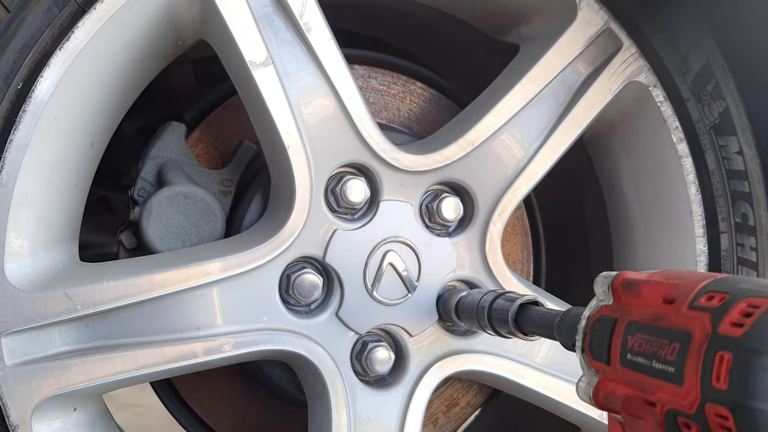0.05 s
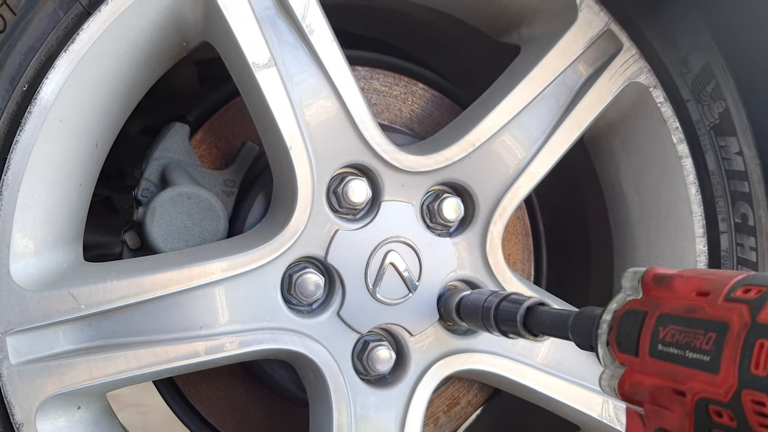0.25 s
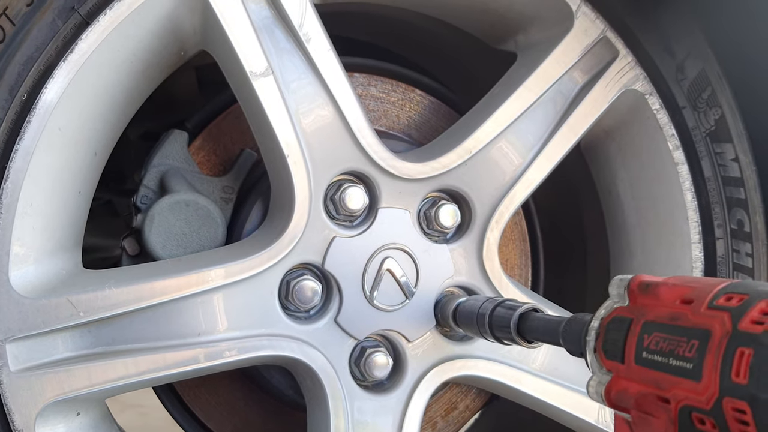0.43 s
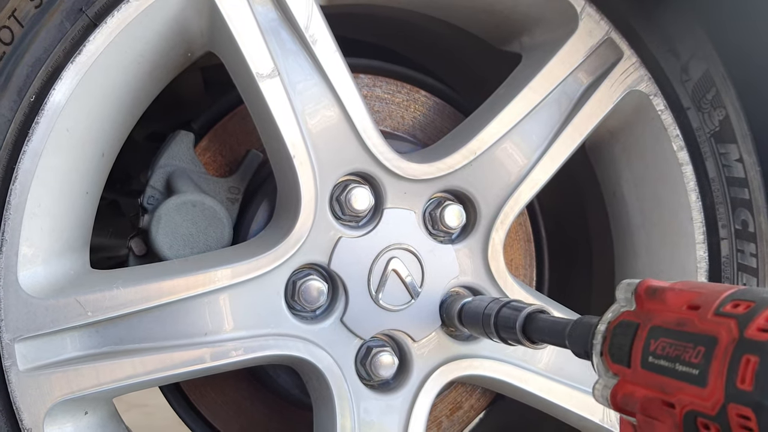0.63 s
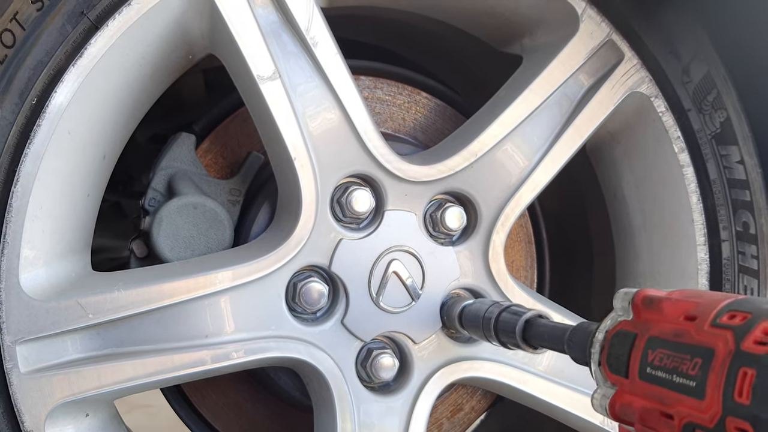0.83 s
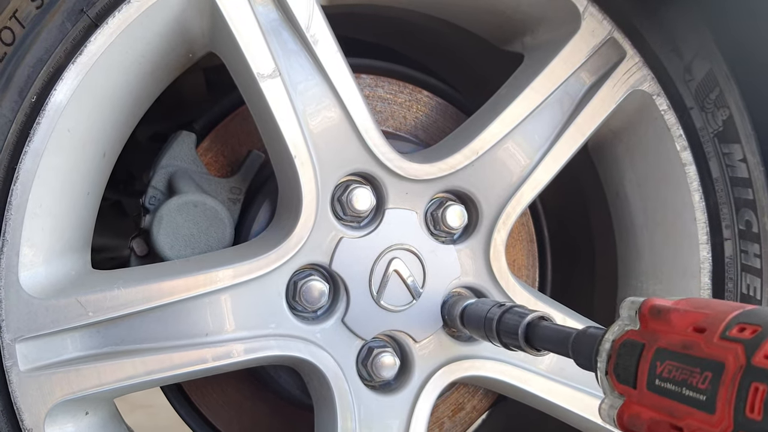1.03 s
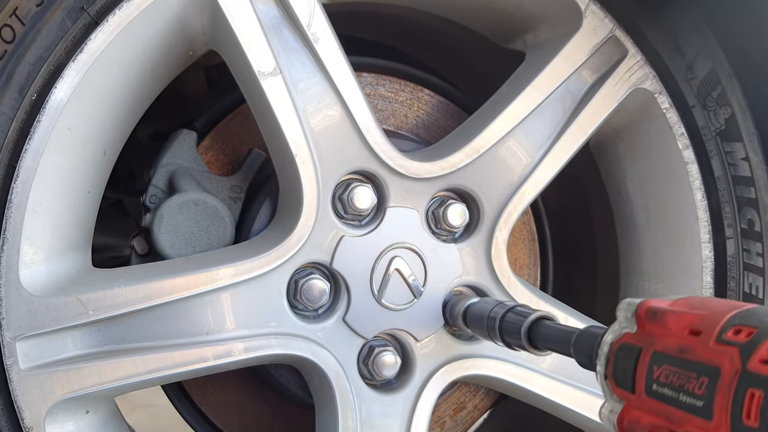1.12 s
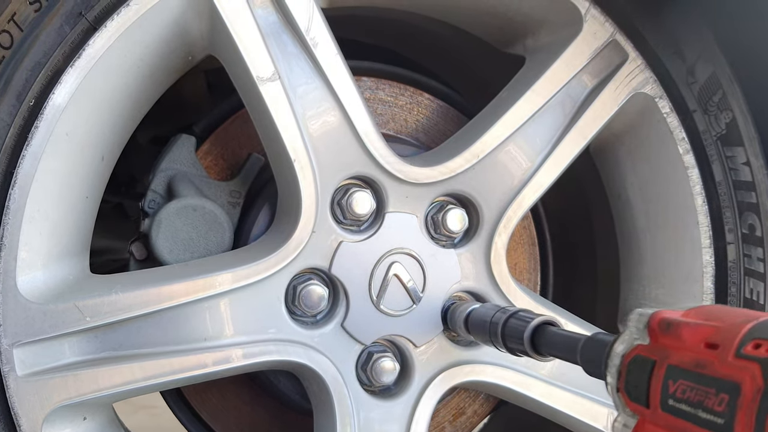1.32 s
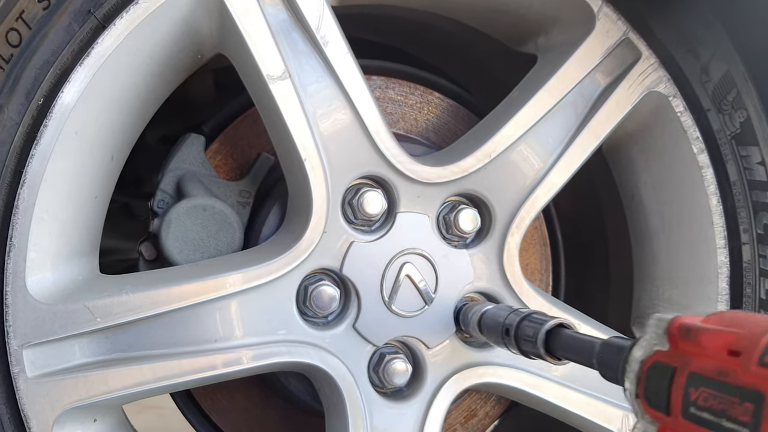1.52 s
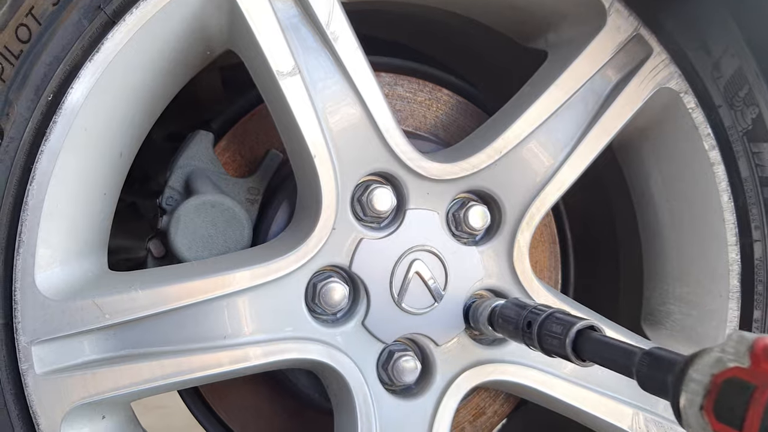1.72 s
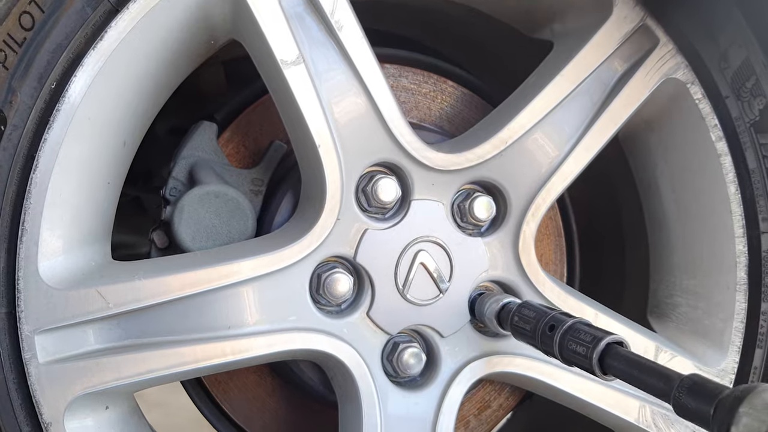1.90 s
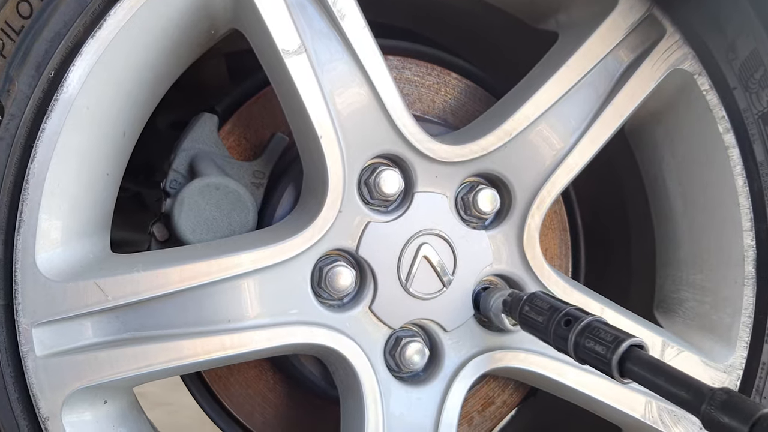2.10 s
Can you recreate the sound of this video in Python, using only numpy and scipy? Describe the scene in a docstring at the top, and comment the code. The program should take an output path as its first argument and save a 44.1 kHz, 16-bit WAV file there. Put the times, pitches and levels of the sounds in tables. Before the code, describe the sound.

Close to the microphones, an impact wrench loosens a car wheel nut: slack knocks, about a second of harsh, dense hammering with wheel ring, lighter gritty spinning with clinks, sudden stop, short reverberant tail, tiny metal touches.

```python
"""In a workshop, close by, a cordless impact wrench loosens a lug nut on an alloy wheel.
Knocks take up the socket's slack; hammer blows, about 47 a second, are noise bursts exciting wheel modes.
The nut then spins: gritty noise and sines that follow motor speed make the whirr, with a brief singing tone
and loose clinks, until the motor brakes with a clunk. Decaying noise by convolution gives the reverberation;
light ticks follow as the socket is drawn off, over faint air and an uneven low rumble."""
import sys
import numpy as np
from scipy import signal
from scipy.fft import rfft, irfft, next_fast_len
from scipy.io import wavfile

SR = 44100
rng = np.random.default_rng(int(sys.argv[2]) if len(sys.argv) > 2 else 0)


def generate_wav(sig):
    """Save sig (samples, or channels by samples) to the path in sys.argv[1] as 16-bit PCM at SR."""
    pcm = np.round(np.clip(np.atleast_2d(sig).T, -1, 1) * 32767).astype(np.int16)
    wavfile.write(sys.argv[1], SR, pcm)


N = 94815
T = np.arange(N) / SR
SIZE = next_fast_len(2 * N)
FREQ = np.maximum(np.arange(SIZE // 2 + 1) * SR / SIZE, 1)

# All levels in the tables are relative: the layer gains are added to them.
# single knocks of hammer and socket: t/s, level/dB, chatter hold/s,
# wheel ring re level/dB, thump re level/dB
KNOCKS = [(0.1472, -15, .002, 8.5, -14.5), (0.1526, -19.5, .002, 13, -17), (0.2108, -11.5, .007, 14, -10.5),
          (0.221, -25.5, .004, 4.5, -3.5), (0.2353, -1.5, .005, 4, 2), (0.2602, -2.5, .004, 0, -4.5),
          (0.2694, -2, .006, -1, -10.5), (0.307, -6, .005, 7, -7), (0.327, -8.5, .003, 0.5, -13),
          (1.133, -22, .001, -1.5, -4), (1.266, -23.5, .005, 0, -1), (1.336, -15, .006, 9.5, -4),
          (1.389, -30.5, .003, 22, 1)]
# hammer blows: t/s, level/dB, recoil thump level/dB
BLOWS = [(0.2936, -4, -23.5), (0.3188, -3.5, -31), (0.3364, -6, -29), (0.3596, -3.5, -26.5),
         (0.3778, -3.5, -24), (0.401, -4.5, -18), (0.4215, -5.5, -25.5), (0.4453, -7.5, -31.5),
         (0.4656, -4, -24.5), (0.4875, -1.5, -24.5), (0.5073, -4, -23), (0.5289, -6.5, -29),
         (0.5495, -4, -33.5), (0.5724, -6.5, -29.5), (0.5917, -3.5, -24.5), (0.6144, -5, -29),
         (0.636, -5, -25), (0.6588, -3.5, -28.5), (0.6777, -3.5, -22.5), (0.7001, -5, -27),
         (0.7204, -5, -29.5), (0.742, -5.5, -38), (0.7652, -8, -25.5), (0.7842, -6, -24), (0.8068, -6, -30),
         (0.828, -3.5, -17), (0.849, -4.5, -26.5), (0.8714, -4.5, -27.5), (0.8931, -4, -24),
         (0.9151, -3.5, -30.5), (0.9355, -4, -21), (0.9582, -5, -31), (0.9803, -6, -37),
         (1.0031, -7.5, -34.5), (1.0236, -3, -26), (1.0466, -3, -26.5), (1.068, -5, -27.5),
         (1.0925, -5, -27.5)]
# colour of the steel contact: f/Hz, level/dB
STEEL_COLOUR = [(60, -14.5), (200, -4), (350, 4), (600, 6), (900, 2.5), (1500, 1), (2200, 2.5), (3200, 4.5),
                (4500, 3.5), (6500, 0), (9000, -1.5), (11000, -0.5), (13000, 5.5), (14500, 1.5),
                (16000, -3)]
# modes of wheel, brake disc, socket and anvil: f/Hz, level/dB, t60/s
WHEEL_MODES = [(315.7, 5.5, .13), (356.3, 4, 0.64), (466.6, 9, .1), (681.5, 4, 0.08), (762, 2, 1.1),
               (1045.6, 9.5, .15), (1072.6, 13, 0.37), (1130, 7.5, .15), (1548, 1.5, 0.23), (1966, 4, 0.13),
               (2606, -0.5, .06), (3260, 1, 0.077), (4130, -1.5, 0.18), (5640, -2, 0.025),
               (12500, -4.5, .015), (13420, -4.5, 0.021)]
# colour of the recoil thump: f/Hz, level/dB
THUMP_COLOUR = [(20, -5.5), (45, 13.5), (65, 16.5), (90, 18.5), (130, 13.5), (200, 4), (320, 4),
                (550, -5.5), (900, -14), (3000, -52)]
# motor effort: t/s, level/dB
MOTOR_LEVEL = [(.145, -48), (.16, -20), (.205, -16), (.25, 6.5), (.7, 7), (1.09, 6.5), (1.13, -3.5),
               (1.22, -2.5), (1.31, -3.5), (1.39, -3.5), (1.415, -6.5), (1.435, -26), (1.5, -70)]
# motor speed: t/s, share of free speed/1
MOTOR_SPEED = [(.145, 0.39), (.22, 0.83), (1.09, .87), (1.15, 1.04), (1.25, 0.96), (1.33, 0.92),
               (1.39, 0.75), (1.44, 0.37)]
# whine partials at free speed: f/Hz, level/dB
WHINE_PARTIALS = [(161, -47), (325, -56.5), (673, -53.5), (1007, -55), (1555, -60), (1943, -59),
                  (4549, -52.5), (4920, -60), (6062, -60.5), (7424, -58)]
# colour of the gear noise: f/Hz, level/dB
GEAR_COLOUR = [(50, -10), (170, -8.5), (350, 6), (650, 5.5), (1000, 9), (1600, 6), (2250, 1), (2700, 6.5),
               (3700, 3.5), (5000, 3), (8000, -0.5), (12000, -1.5), (16000, -6.5)]
# gliding tone of the spinning socket: t/s, f/Hz, level/dB
SING_TRACK = [(1.2, 3270, -75), (1.25, 3300, -34), (1.29, 3300, -63), (1.325, 3350, -32.5),
              (1.34, 3280, -53), (1.37, 3250, -100)]
# colour of the loose clinks: f/Hz, level/dB
RATTLE_COLOUR = [(100, 6), (3000, -3), (6000, 2), (15000, -20)]
# touches as the socket seats and comes off: t/s, tap level/dB, ring f/Hz, ring level/dB
TICK_EVENTS = [(.12, -32.5, 1904, -42), (1.628, -51.5, 1100, -75), (1.777, -58, 3290, -64),
               (1.786, -59.5, 1080, -53.5), (1.944, -54.5, 2527, -60), (2.057, -56, 2606, -70),
               (2.086, -60, 6930, -81.5), (2.111, -58, 2054, -68)]
# colour of the taps: f/Hz, level/dB
TICK_COLOUR = [(100, 1.5), (1000, 6.5), (5000, -2.5), (7500, -13.5), (11000, -18.5), (16000, -25.5)]
# reverberation by band: f/Hz, t60/s, level/dB
ROOM_DECAY = [(100, 0.94, -16.5), (220, 0.47, -22), (384, 0.78, -10), (750, .8, -16.5), (1100, 0.54, -13.5),
              (2180, 0.68, -11), (3330, 0.58, -12), (5000, 0.61, -13), (9000, 0.26, -18.5),
              (15000, .33, -21.5)]
# colour of the reverberant wash already fading at the start: f/Hz, level/dB
WASH_COLOUR = [(100, 6), (400, 13), (1000, 7.5), (2500, 9), (5000, 5.5), (9000, -7), (15000, -20.5)]
# colour of the faint air: f/Hz, level/dB
AIR_COLOUR = [(60, -7.5), (200, -4.5), (400, 4), (700, -19), (1100, -13), (2500, -19), (5000, -27.5),
              (7000, -33), (10000, -33.5), (15000, -59)]
# colour of the low rumble: f/Hz, level/dB
RUMBLE_COLOUR = [(20, -30.5), (45, -12), (70, -7.5), (88, 4.5), (110, -3.5), (160, -11.5), (260, -21.5),
                 (600, -35.5), (2000, -74.5)]
# course of the rumble: t/s, level/dB
RUMBLE_LEVEL = [(0, -49), (.05, -41), (.12, -49), (.19, -43.5), (1.15, -49), (1.36, -53.5), (1.41, -39),
                (1.48, -53), (1.55, -41), (1.63, -60), (1.70, -46), (1.78, -58), (1.87, -50.5), (1.95, -59),
                (2.02, -66), (2.09, -54.5), (2.15, -50.5)]
# stereo width: f/Hz, side re mid level/dB
SIDE_TO_MID = [(40, 7.5), (85, 5), (175, 2), (350, -1.5), (700, -4.5), (1200, -5), (1800, -1.5), (2800, 2),
               (5000, -.3), (12000, 0)]

# envelopes: attack time, release time constants; blows also start late by BITE_S
ATTACK_S, RELEASE_S, BITE_S, CHATTER_S = .0009, .0045, .0006, .0048
CRACK_DB, CRACK_S, GRAIN_DB = 1.5, 0.00081, 2.5
BLOW_DB, RECOIL_DB = 5, 25  # added to the levels in BLOWS
STEEL_DB, WHEEL_DB, THUMP_DB, THUMP_S = -15, -12.5, -7.5, 0.0089
THUMP_SHAKE_DB, KICK_DB, KICK_S = -2, -5, 0.00061
CAM_DB, CAM_S = -13, .003
CLANG_DB, CLANG_S, CLANG_LOW_HZ, CLANG_HIGH_HZ = -25, .007, 1300, 15500
WHINE_DB, WHINE_WAVER = 1, .006  # waver as a share of speed
GEAR_DB, GEAR_GRAIN_DB, GEAR_RING_DB, GEAR_UNEVEN_DB = -30, 1, -28.5, 1.5
TURN_HZ, TURN_DB = 34.23, 2  # wobble once a turn, rate at free speed
RATTLE_FROM_S, RATTLE_TO_S, RATTLE_DB, RATTLE_SCATTER_DB = 1.14, 1.38, -45, 2.5
BRAKE_S, BRAKE_HZ, BRAKE_DB, BRAKE_RISE_S = 1.394, 570, -23, 0.0029
TICK_S, TICK_RING_S = 0.0042, 0.014
ROOM_RISE_S = 0.0063
WASH_DB, WASH_FALL_DB_S, AIR_DB = -48, 75.5, -67
TOP_HZ = 15900


def undb(db):
    """Amplitude ratio: decibels to gain."""
    return 10 ** (np.asarray(db) / 20)


def curve(rows, at=T, axis=1):
    """Linear interpolation of one table column."""
    rows = np.array(rows)
    return np.interp(at, rows[:, 0], rows[:, axis])


def per_hz(rows, axis=1):
    """Interpolation of one table column over log frequency."""
    rows = np.array(rows)
    return np.interp(np.log(FREQ), np.log(rows[:, 0]), rows[:, axis])


def through(x, response):
    """Linear filtering: multiplication of spectra."""
    return irfft(rfft(x, SIZE) * response, SIZE)[..., :N]


def colour(x, rows):
    """Minimum-phase filtering: a folded cepstrum gives a causal response."""
    cepstrum = irfft(np.log(undb(per_hz(rows))), SIZE)
    cepstrum[1:SIZE // 2] *= 2
    cepstrum[SIZE // 2 + 1:] = 0
    return through(x, np.exp(rfft(cepstrum)))


def unit(x):
    """Normalization to rms 1."""
    return x / np.sqrt(np.mean(x ** 2))


def noise():
    """Two uncorrelated white noises."""
    return rng.standard_normal((2, N))


def walk(rate_hz):
    """Slow random modulation: interpolated normal draws with a spread near 1."""
    return np.interp(T * rate_hz, np.arange(N), rng.standard_normal(N)) * np.sqrt(3 / 2)


def grit(grain_db):
    """Amplitude-modulated noise: dense micro-impacts of uneven size."""
    return unit(noise() * undb(grain_db * walk(3000)))


def burst(start, hold, release):
    """Impulsive excitation: quick attack, hold, exponential release."""
    out, first = np.zeros(N), int(start * SR)
    age = T[:min(SR // 8, N - first)]
    attack = np.minimum(age / ATTACK_S, 1)
    out[first:first + len(age)] = attack * np.exp(-np.maximum(age - hold, 0) / release)
    return out


def tone(cycles):
    """Sinusoidal oscillation with an independent random phase in each channel."""
    return np.sin(2 * np.pi * (cycles + rng.random((2, 1))))


def hammer():
    """Impact excitation: blows crack, chatter, ring the wheel and recoil; the lugs scrape up the cam."""
    hits = [(at, db, chatter, db + ring, db + thump) for at, db, chatter, ring, thump in KNOCKS]
    hits += [(at + BITE_S, db + BLOW_DB, CHATTER_S, db + BLOW_DB, thump + RECOIL_DB)
             for at, db, thump in BLOWS]
    contact, shake, recoil, kick, clangs = 0, 0, 0, 0, 0
    for at, db, chatter, ring_db, thump_db in hits:
        push = burst(at, chatter, RELEASE_S) + undb(CRACK_DB) * burst(at, 0, CRACK_S)
        contact = contact + undb(db) * push
        shake = shake + undb(ring_db) * push
        recoil = recoil + undb(thump_db) * burst(at, 0, THUMP_S)
        kick = kick + undb(thump_db) * burst(at, 0, KICK_S)
        clangs = clangs + undb(db + CLANG_DB) * clang(at)
    # the scrape swells before each blow and fades after it
    cam = sum(undb(db + BLOW_DB + CAM_DB) * np.exp(-np.minimum(abs(T - at) / CAM_S, 20))
              for at, db, _ in BLOWS)
    steel = undb(STEEL_DB) * colour(np.hypot(contact, cam) * grit(GRAIN_DB), STEEL_COLOUR) + clangs
    ringing = undb(WHEEL_DB) * wheel(shake * noise())
    push_back = undb(THUMP_SHAKE_DB) * recoil * noise() + undb(KICK_DB) * kick
    return steel + ringing + undb(THUMP_DB) * colour(push_back, THUMP_COLOUR)


def wheel(x):
    """Modal superposition: parallel damped resonances of wheel, socket and anvil."""
    response = 0
    for hz, db, t60 in WHEEL_MODES:
        q = np.pi * hz * t60 / np.log(1000)
        response = response + undb(db) / (1 + 1j * q * (FREQ / hz - hz / FREQ))
    return through(x, response)


def clang(start, count=10):
    """Free vibration: short steel rings at random pitches, new for each impact."""
    chance, out, first = rng.random((count, 3, 1)), np.zeros((2, N)), int(start * SR)
    age = T[:SR // 20]
    hz = CLANG_LOW_HZ + (CLANG_HIGH_HZ - CLANG_LOW_HZ) * chance[:, :1] ** 0.98
    rings = np.sin(2 * np.pi * (hz * age + chance[:, 1:])).sum(axis=0)
    out[:, first:first + len(age)] = rings * np.exp(-age / CLANG_S)
    return out


def motor():
    """Gear-mesh excitation: whine pitch follows speed, and gritty tooth noise also shakes the wheel."""
    speed = curve(MOTOR_SPEED)
    wobble = undb(TURN_DB * np.sin(2 * np.pi * TURN_HZ * np.cumsum(speed) / SR))
    teeth = grit(GEAR_GRAIN_DB) * wobble * undb(GEAR_UNEVEN_DB * walk(220))
    run = np.cumsum(speed * (1 + WHINE_WAVER * walk(90))) / SR
    whine = sum(undb(db + WHINE_DB + 3 * walk(40)) * tone(hz * run) for hz, db in WHINE_PARTIALS)
    whirr = undb(GEAR_DB) * colour(teeth, GEAR_COLOUR)
    ringing = undb(GEAR_RING_DB) * wheel(teeth)
    return undb(curve(MOTOR_LEVEL)) * (whirr + ringing + whine)


def sing():
    """Frequency modulation: the spinning socket sings with a gliding, wavering pitch."""
    hz = curve(SING_TRACK) * (1 + WHINE_WAVER * walk(300))
    return undb(curve(SING_TRACK, axis=2)) * tone(np.cumsum(hz) / SR)


def rattle(count=12):
    """Random impacts: the loose socket clinks on the nut as it spins."""
    clinks = 0
    for at in rng.uniform(RATTLE_FROM_S, RATTLE_TO_S, count):
        level_db = RATTLE_DB + RATTLE_SCATTER_DB * rng.standard_normal()
        clinks = clinks + undb(level_db) * clang(at, count=4)
    return colour(clinks, RATTLE_COLOUR)


def brake():
    """Heavily damped oscillation: the gear train stops with a short hollow clunk."""
    age = np.maximum(T - BRAKE_S, 0) / BRAKE_RISE_S
    return undb(BRAKE_DB) * age * np.exp(1 - age) * np.sin(2 * np.pi * BRAKE_HZ * (T - BRAKE_S))


def ticks():
    """Light contact: each metal touch is a noise tap with a briefly decaying sine."""
    taps, rings = 0, 0
    for at, tap_db, hz, ring_db in TICK_EVENTS:
        taps = taps + undb(tap_db) * burst(at, 0, TICK_S)
        rings = rings + undb(ring_db) * burst(at, 0, TICK_RING_S) * tone(hz * T)
    return colour(taps * noise(), TICK_COLOUR) + rings


def room(x):
    """Diffuse reverberation: convolution with noise bands, each decaying at its own rate."""
    tail, hiss = 0, rfft(noise(), SIZE)
    centres = np.log([row[0] for row in ROOM_DECAY])
    # each row of the identity matrix is one triangular band on the log-frequency axis
    for share, (_, t60, db) in zip(np.eye(len(ROOM_DECAY)), ROOM_DECAY):
        fade = np.exp(-np.log(1000) * T / t60) * (1 - np.exp(-T / ROOM_RISE_S))
        band = irfft(hiss * np.interp(np.log(FREQ), centres, share), SIZE)[:, :N]
        tail = tail + undb(db) * band * fade / np.sqrt(np.sum(fade ** 2))
    return through(x, rfft(tail, SIZE))


def background():
    """Filtered noise: a fading reverberant wash, faint steady air and an uneven low rumble."""
    wash = undb(WASH_DB - WASH_FALL_DB_S * T) * colour(noise(), WASH_COLOUR)
    air = undb(AIR_DB) * unit(colour(noise(), AIR_COLOUR))
    rumble = undb(curve(RUMBLE_LEVEL)) * unit(colour(noise(), RUMBLE_COLOUR))
    return wash + air + rumble


def widen(x):
    """Mid-side stereophony: the side-to-mid balance varies with frequency."""
    ratio = undb(per_hz(SIDE_TO_MID))
    gains = np.array([np.ones_like(ratio), ratio]) / np.hypot(1, ratio)
    mid, side = through(x, gains)  # the two input channels serve as mid and side
    return np.array([mid + side, mid - side])


def scene():
    """Superposition: the direct sound of wrench and wheel, its reverberation and the background."""
    tool = hammer() + motor() + sing() + rattle() + brake() + ticks()
    return widen(tool + room(tool) + background())


def record(dry):
    """Amplitude and band limiting: clipping at full scale, then a steep low-pass."""
    lowpass = signal.ellip(10, .2, 70, TOP_HZ, fs=SR, output="sos")
    return signal.sosfilt(lowpass, np.clip(dry, -1, 1))


dry = scene()
out = record(dry)
generate_wav(out)
```